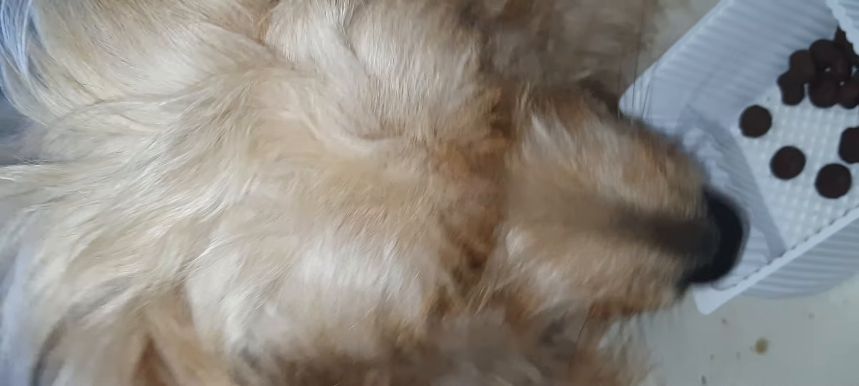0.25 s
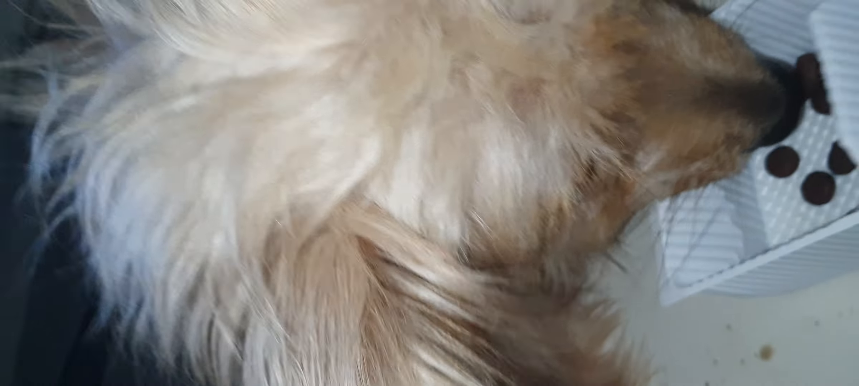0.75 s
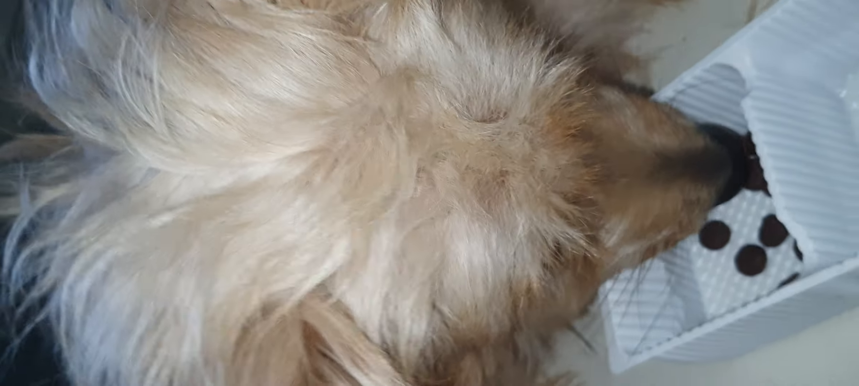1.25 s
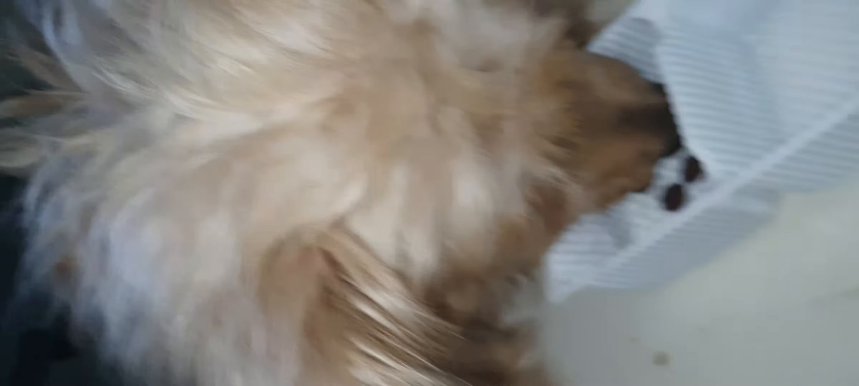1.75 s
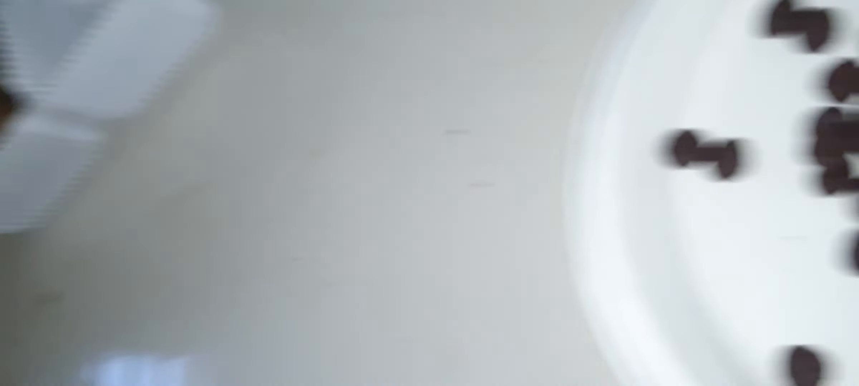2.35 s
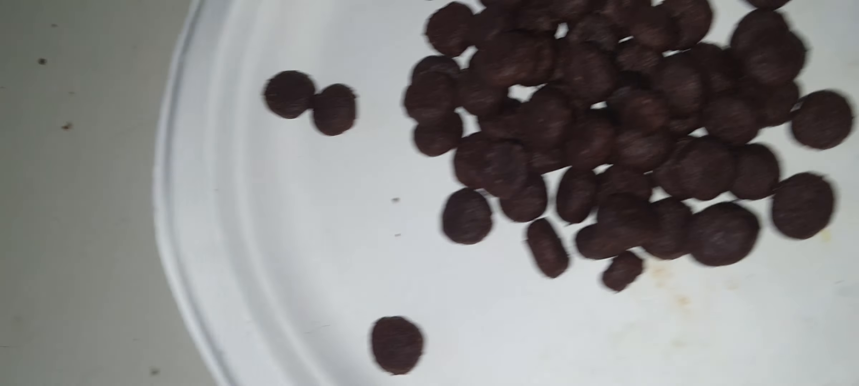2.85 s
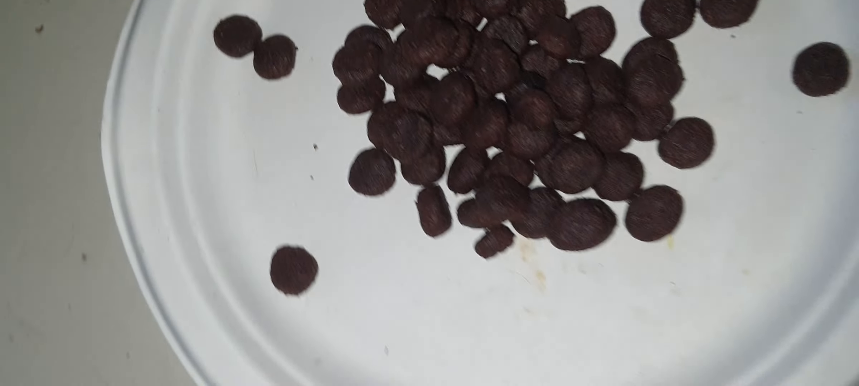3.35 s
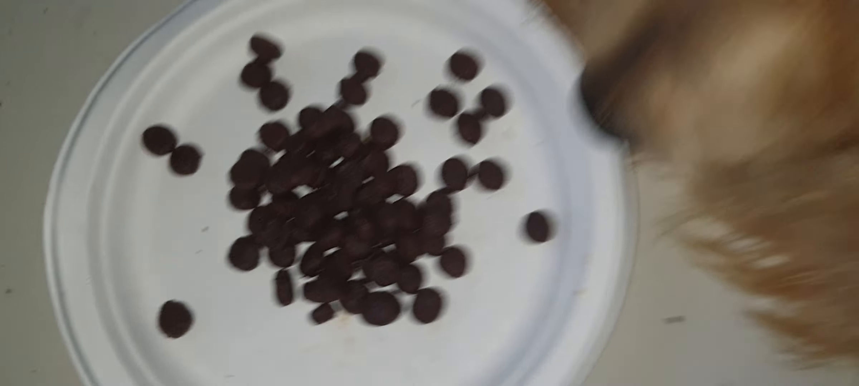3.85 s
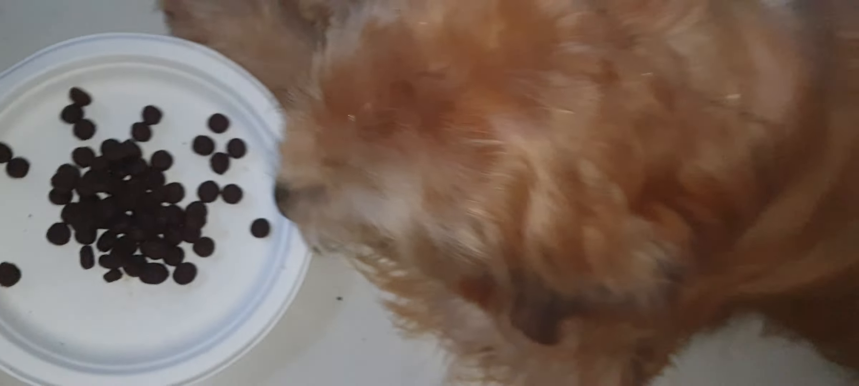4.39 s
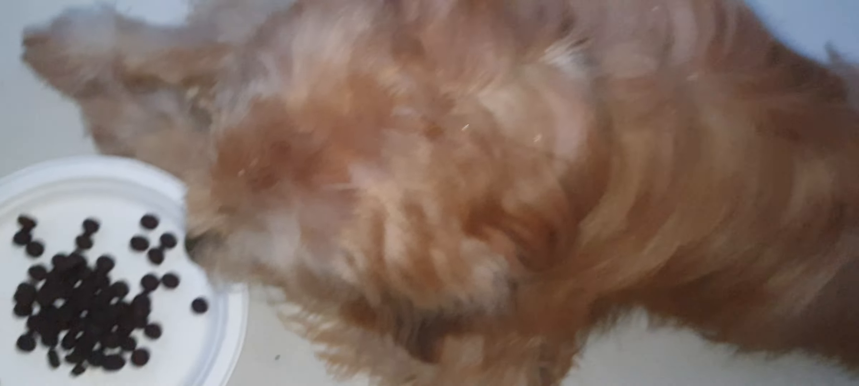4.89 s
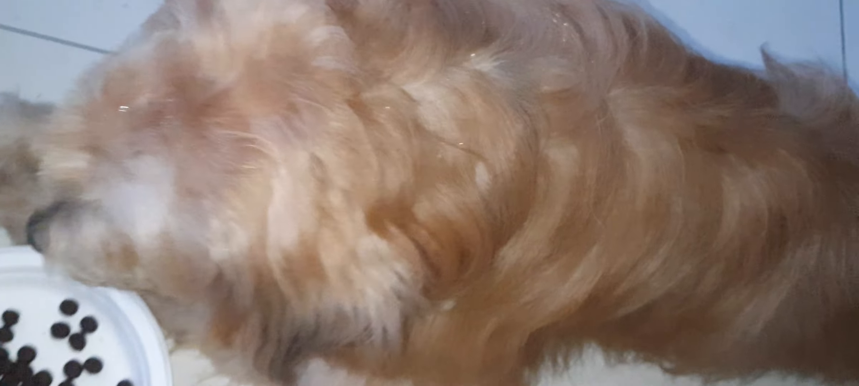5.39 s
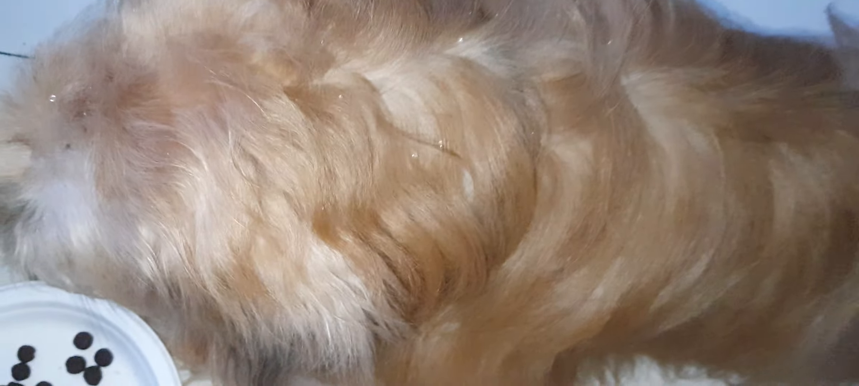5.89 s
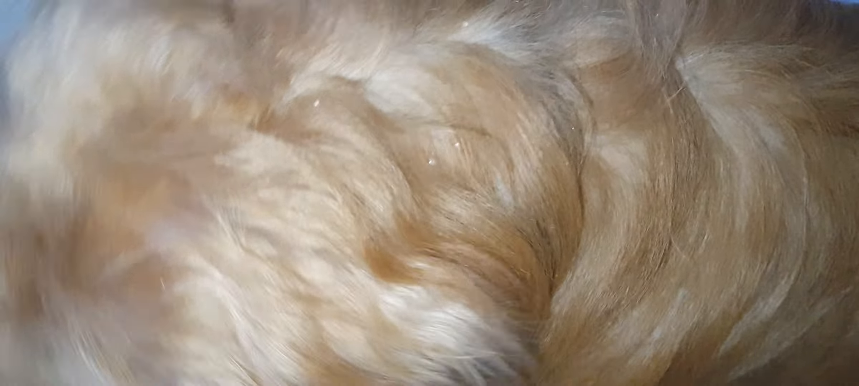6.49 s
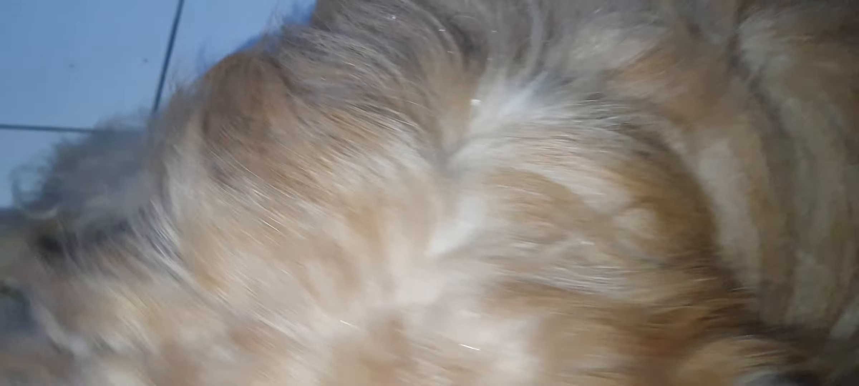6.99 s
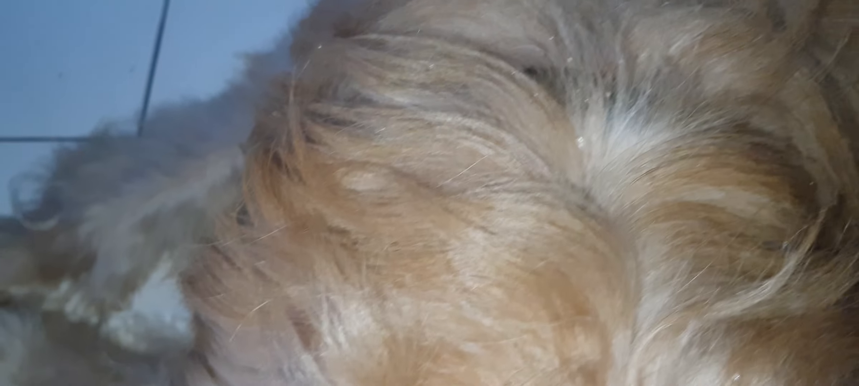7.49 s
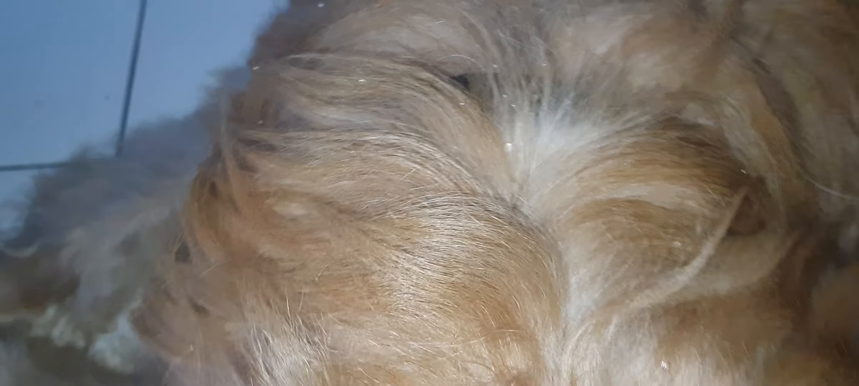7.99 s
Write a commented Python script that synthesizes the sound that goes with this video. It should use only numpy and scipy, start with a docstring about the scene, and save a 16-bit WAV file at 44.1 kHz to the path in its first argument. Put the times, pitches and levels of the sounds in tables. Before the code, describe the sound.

A small dog, very close to a hand-held microphone, starts with a soft closed-mouth grumble and a sniff. At about 0.7 seconds it gives one low, fluttering growl with snarling breath, the loudest sound, fading by 1.5 seconds. From 1.6 seconds it eats dry biscuits: teeth click lightly, and biscuits crack and crumble in a cluster between 2.5 and 3.1 seconds. A few sharp clicks follow until 4 seconds while a low rumble swells. More crunches come unevenly from 4.8 to 6.4 seconds, then several sniffs up to 7.3 seconds. The strongest crunch, with a dull jaw knock, lands at about 7.6 seconds, as the coat rustles past the microphone and small clicks continue to the end, just after 8 seconds. The eating has a short, faint echo from tiles, and the dog sits slightly right. Quiet room noise and a low hum run throughout.

```python
"""A small dog growls once over its dry biscuits, then eats them from a plastic tray and a plate, close up.
Slack throat tissue flaps to make the growl, with a closed-mouth grumble either side of it. Teeth click,
jaws knock and biscuits crack and crumble, with a short echo off the tiled floor and walls. Air hisses
through the nose, and the coat brushes past the hand-held microphone. Underneath lies a bed of room
noise, low hum and rumble."""
import sys
import numpy as np
from scipy import signal
from scipy.fft import rfft, irfft
from scipy.io import wavfile
from scipy.ndimage import uniform_filter1d

SR = 44100
rng = np.random.default_rng(int(sys.argv[2]) if len(sys.argv) > 2 else 0)


def persist_wave(psi):
    """Save psi, clipped to +-1, as 16-bit WAV."""
    counts = np.round(np.clip(psi, -1, 1) * 32767).astype(np.int16)
    wavfile.write(sys.argv[1], SR, np.atleast_2d(counts).T)


N = 363384
TIME = np.arange(N) / SR
FREQ = np.maximum(np.arange(N // 2 + 1) * SR / N, 1)

# the growl's contour: t/s, flap rate/Hz, effort/dB
GROWL = [(.675, 33, -54), (.695, 30, -18), (.735, 32.5, -13.5), (.85, 34.5, -16.5), (.92, 30.3, -18),
         (1.12, 26.6, -16.5), (1.27, 31.5, -21), (1.33, 23, -26.5), (1.41, 21, -61)]
# the lips draw back: t/s of the widest, half length/s, opening/dB
SNARLS = [(0.697, 0.012, 18.5), (0.774, 0.038, 10.5), (0.966, 0.032, 2.5), (1.179, 0.018, 9)]
# resonances of chest, throat, mouth, nose and the grumble's rasp: f/Hz, width/Hz, level/dB
CHEST_MODES = [(104, 54.4, -6.5), (154.6, 10.3, -4)]
THROAT_MODES = [(200.6, 37, 0.21), (236.7, 60, -1.2)]
MOUTH_MODES = [(443, 230, -20.5), (513, 156, -21.5), (610.6, 34, -16.5), (770, 550, -36), (1444, 240, -33),
               (2106, 960, -46.5)]
NOSE_MODES = [(4650, 1760, -3), (6830, 1800, -1), (12200, 2500, -12)]
RASP_MODES = [(100.5, 66, 2.0), (154, 184, -10), (257, 270, -22.5)]
# envelope of the closed-mouth grumble: t/s, level/dB
GRUMBLE_LEVEL = [(0, -26.5), (.08, -37.5), (.186, -31), (.255, -43), (.3, -32.5), (.48, -35.5),
                 (.66, -35.5), (1.38, -33), (1.56, -52.5)]
# biscuits breaking: t/s, crack level/dB, crack f/Hz, crumble level/dB, crumble t60/s
BITES = [(1.804, -41, 3450, -38, 0.49), (2.5802, -24, 4630, -30, 0.11), (2.617, -18.5, 3100, -30.5, 0.42),
         (2.9069, -27, 3900, -28.5, 0.7), (3.059, -39, 2330, -26.5, 0.21), (4.7658, -21, 7460, -24, 0.42),
         (4.9082, -23.5, 6200, -29, 0.31), (5.2137, -25, 2690, -33, 0.27), (5.7534, -27.5, 2577, -31, 0.49),
         (5.934, -24.5, 3980, -34, 0.27), (6.164, -32, 7450, -38, 0.78), (6.239, -36, 5800, -28.5, 0.27),
         (6.399, -32, 2280, -30, 0.42), (7.5631, -20, 2190, -30, .03), (7.5792, -28, 2600, -21, 0.037),
         (7.5867, -15.5, 3100, -15.5, 0.041), (7.7158, -18, 4220, -33, .03)]
# teeth and biscuits clicking: t/s, level/dB, f/Hz
CLICKS = [(1.6227, -27, 3790), (1.6876, -25, 6760), (1.718, -28, 3090), (1.8602, -24, 3940),
          (2.2533, -28, 3430), (2.2952, -23, 6030), (2.4074, -34, 1740), (2.4763, -15, 4450),
          (2.6409, -24, 3690), (2.9218, -18, 3750), (3.2321, -34, 2310), (3.4201, -24, 6360),
          (3.5169, -15, 6890), (3.8821, -15, 5390), (4.7865, -23, 7440), (5.1437, -33, 2910),
          (6.4113, -24, 1950), (7.236, -25, 3470), (7.4709, -31, 2150), (7.5004, -25, 3760),
          (7.873, -20, 6190), (8.0182, -26, 7220), (8.0596, -23, 6500), (8.0845, -25, 5470)]
# dull knocks of the jaws: t/s, level/dB, f/Hz
KNOCKS = [(3.073, -39, 630), (3.519, -38, 950), (4.915, -37.5, 545), (7.586, -25.5, 1040)]
# spells of stray ticks: start/s, end/s, level/dB, f/Hz
TICK_SPELLS = [(1.801, 1.85, -36, 4240), (2.899, 3.099, -38, 2200), (4.851, 4.999, -39, 2600),
               (5.768, 5.9, -40, 2200), (6.745, 6.9, -36, 2434), (7.203, 7.304, -34, 2530),
               (7.509, 7.704, -30.5, 2380), (7.749, 8.2, -32, 6500)]
# where the muzzle sits in the stereo image: t/s, left minus right/dB
MUZZLE_PAN = [(2.3, -6), (3.0, -5), (3.7, -17), (4.8, -5.5), (7.2, -2.5), (7.6, -6)]
# sniffs and puffs: t/s of the peak, level/dB, swell/s, tilt/(dB per octave)
SNIFFS = [(.192, -33, 0.017, 6), (.55, -39.5, 0.042, 5.5), (.71, -30.5, 0.024, 0.5),
          (.79, -30.5, .03, -1.5), (1.37, -39, 0.083, 5), (2.015, -47, 0.02, 4), (2.38, -47, 0.084, 2),
          (2.725, -39.5, 0.021, 3.5), (3.869, -48, 0.04, 3), (6.473, -38.5, 0.028, 10),
          (6.82, -40, 0.044, 6), (7.0, -44.5, 0.14, 8.5), (7.25, -32.5, 0.028, 4.5)]
# how firmly the coat brushes past: t/s, level/dB
COAT_TOUCH = [(7.49, -39), (7.57, -38), (7.595, -36), (7.69, -33), (7.85, -42), (7.93, -36), (8.04, -41.5),
              (8.24, -45.5)]
# tone of crumbs, nostril air, and the coat's body and sheen: f/Hz, level/dB
CRUMB_EQ = [(150, -19), (400, 33), (1000, 24), (2300, 16), (3500, 8), (5000, 7.5), (7200, 3.5),
            (16000, -8.5)]
SNIFF_EQ = [(200, 18), (600, 8.5), (1500, 2), (2400, 3.5), (3400, 0), (5000, 1), (7200, -1), (16000, -8.5)]
COAT_BODY_EQ = [(150, -2), (380, 2.5), (800, -4.5), (1300, -2.5), (2300, 1.5), (3500, -5.5),
                (6000, -19), (16000, -34)]
COAT_SHEEN_EQ = [(1000, -36), (3000, 6), (4500, 21), (7200, 25.5), (16000, 18)]
# envelope of the room noise: t/s, level/dB
ROOM_LEVEL = [(0, -42), (.6, -52.5), (2.35, -53.5), (2.7, -46.5), (5.1, -45.5), (6.7, -47), (8.24, -45.5)]
# envelope of the rumble, strongest as the microphone swings over to the plate: t/s, level/dB
RUMBLE_LEVEL = [(1.55, -47), (2.05, -42.5), (2.4, -46.5), (2.6, -40), (3.8, -33.5), (4.0, -41),
                (4.6, -47.5), (4.9, -39.5), (5.15, -51.5), (6.5, -43), (6.72, -49.5), (7.9, -42)]
# resonances of the rumble: f/Hz, width/Hz, level/dB
RUMBLE_MODES = [(41.6, 39, -8.5), (66.4, 20, -1), (89.6, 12.4, 2.5), (109.7, 22, 2), (137.6, 39.5, -3),
                (202.7, 156, -11.5)]
# partials of the hum: f/Hz, level/dB
HUM_PARTIALS = [(110, -59.5), (329, -61)]
# tone of the room noise, the hiss and the microphone: f/Hz, level/dB
ROOM_EQ = [(25, -9), (45, -2), (100, 13), (190, -8), (320, 3.5), (450, -3), (700, -4), (1100, -7.5),
           (2000, -15.5), (4000, -21), (16000, -37)]
HISS_EQ = [(500, -1.5), (2000, -6), (4000, -6), (7000, -3.5), (16000, -9)]
MICROPHONE_EQ = [(20, -25), (45, -0.5), (65, 0), (7400, -3), (8400, -10.5), (9700, -24), (12000, -9.5),
                 (16000, -7)]

CLICK_T60_S, BITE_T60_S = .006, .012  # a tooth taps more briefly than a biscuit breaks


def growl(throat_db=-6, mouth_db=-10, nose_db=-24, sag_db_per_s=7, lag_s=.00041):
    """Slack throat tissue flaps unevenly, thumping the chest and puffing through throat, mouth and nose."""
    jitter, scatter_db, flutter_db = .03, 1.1, 2.2
    open_share, leak = .5, .27
    onset_s = GROWL[1][0]
    flap_hz, effort_db = curves(GROWL)
    opening_db = sum(db * swell(TIME - s, width) for s, width, db in SNARLS)
    cycles = np.cumsum(flap_hz * (1 + jitter * drift(30)) * (TIME > onset_s)) / SR
    flap = np.ceil(cycles).astype(int)
    strength = undb(scatter_db * rng.standard_normal(1024))[flap]
    # soft tissue closes over about a millisecond
    thumps = uniform_filter1d(unit(np.diff(flap, prepend=0) * strength), size=44)
    # the gap snaps open, flutters wetly and closes again within each cycle
    gap = np.exp(-(cycles % 1 / open_share) ** 3) + leak
    puff = unit(strength * gap * undb(flutter_db * drift(200)))
    spittle = grains(N, rate_hz=7000, spread_db=2.5)
    chest = resonate(thumps + .45 * puff * diffuse_noise(), CHEST_MODES) * pan(-6)
    throat = resonate(thumps + 1.1 * puff * diffuse_noise(), THROAT_MODES) * pan(-6.5)
    mouth = resonate(thumps + 2.2 * puff * diffuse_noise(), MOUTH_MODES) * pan(-8.5)
    nose = resonate(puff * spittle, NOSE_MODES) * pan(-15)
    # the chest tone sags as the lungs empty
    chest *= undb(-sag_db_per_s * np.maximum(TIME - onset_s, 0))
    # open lips let out more air and mouth tone and take pressure off the chest
    mouth *= undb(mouth_db + .55 * opening_db)
    nose *= undb(nose_db + opening_db)
    voice = chest + undb(throat_db) * throat + mouth + nose
    left, right = voice * undb(effort_db - .31 * opening_db) * gate(GROWL)
    return np.array([np.interp(TIME - lag_s, TIME, left), right])  # reaches the left a little later


def grumble(pitch_hz=96, waver=.045, roughness=.72, air_db=-46):
    """The chest rumbles softly and unsteadily with the mouth shut; the air leaves through the nose."""
    tone = sine(pitch_hz * (1 + waver * drift(29.3)))
    rasp = resonate(diffuse_noise(), RASP_MODES)
    air = equalise(diffuse_noise(), HISS_EQ) * undb(air_db) * pan(-10)
    level_db, = curves(GRUMBLE_LEVEL)
    chest = unit(tone + roughness * rasp) * undb(level_db) * pan(-4)
    return (chest + air) * gate(GRUMBLE_LEVEL)


def bites(crumble_db=-4, rise_s=.0038, size=22050):
    """A biscuit cracks, then gives way in a dying shower of tiny fractures."""
    out, t = np.zeros((2, N)), np.arange(size) / SR
    for s, crack_db, hz, db, t60 in BITES:
        envelope = np.minimum(t / rise_s, 1) * decay(np.maximum(t - rise_s, 0), t60)
        tilt_db = 10.5 + 5 * np.log2(hz / 4000)  # a brighter crack leaves brighter crumbs
        crumbs = tilted(grains(size, rate_hz=7000, spread_db=2.6), CRUMB_EQ, tilt_db)
        add(out, s, crack(crack_db, hz, BITE_T60_S, width=2.3, body_db=-6) * muzzle_pan(s, hz))
        add(out, s, crumbs * envelope * undb(db + crumble_db) * muzzle_pan(s, hz))
    return out


def crack(db, hz, t60, width, body_db, size=4096):
    """A broad snap: a brief burst of fracture rings a wide resonance and trails a faint rattle."""
    trim_db, snap_db, rattle_db, rattle_t60_s, lag_s = -6.3, -9, -24, .045, .0003
    t, freq = np.arange(size) / SR, frequencies(size)
    envelope = decay(t, t60) + undb(rattle_db) * decay(t, rattle_t60_s)
    shared, left, right = rng.standard_normal((3, size)) * envelope
    burst = np.array([shared + left, np.interp(t - lag_s, t, shared + right, left=0)])
    ring = resonances([(hz, width * hz, 0), (1800, 4500, body_db)], freq)
    snap = shape(burst, ring + undb(snap_db) * freq / (freq + 700))
    snap /= np.sqrt(np.sum(snap ** 2, axis=1, keepdims=True) / (.004 * SR))  # energy of 4 ms at rms 1
    return snap * undb(db + trim_db)


def clicks():
    """Teeth tap on biscuits and biscuits on the dish."""
    out = np.zeros((2, N))
    for s, db, hz in CLICKS:
        add(out, s, crack(db, hz, CLICK_T60_S, width=1.2, body_db=-6) * muzzle_pan(s, hz))
    return out


def jaw_knocks(attack_s=.00052, t60=.036, width=.73, size=4096):
    """The jaws close on a biscuit and the mouth rings briefly."""
    out, t = np.zeros((2, N)), np.arange(size) / SR
    envelope = np.minimum(t / attack_s, 1) * decay(t, t60)
    for s, db, hz in KNOCKS:
        ring = resonate(rng.standard_normal(size), [(hz, width * hz, 0)])
        add(out, s, ring * envelope * undb(db) * pan(-5))
    return out


def stray_ticks(rate_hz=20, scatter_db=4, scatter_octaves=.4):
    """Faint ticks fall at uneven moments, each with its own weight and colour."""
    out = np.zeros((2, N))
    for start, end, db, hz in TICK_SPELLS:
        for s in np.arange(start, end, 1 / rate_hz):
            strength, pitch = rng.uniform(-.58, 1, 2)
            tick_hz = hz * 2 ** (scatter_octaves * pitch)
            tick = crack(db + scatter_db * strength, tick_hz, CLICK_T60_S, width=1, body_db=-12)
            onset_s = min(s + rng.random() / rate_hz, TIME[-1])
            add(out, onset_s, tick * muzzle_pan(s, hz))
    return out


def sniffs(trim_db=1, size=32768):
    """Air hisses through the nostrils, fading more slowly than it swells."""
    out = np.zeros((2, N))
    for s, db, swell_s, tilt_db in SNIFFS:
        start = max(s - np.pi * swell_s, 0)
        envelope = swell(start - s + np.arange(size) / SR, swell_s, fade=1.64)
        air = tilted(grains(size, rate_hz=20000, spread_db=1.2), SNIFF_EQ, tilt_db)
        add(out, start, air * envelope * undb(db + trim_db))
    return out * pan(-6)


def coat_rustle(firm_tilt_db=-4.5, brightening=.65, patchiness_db=1.6):
    """Hairs catch and slip in patches; a lighter touch sounds brighter."""
    touch_db, = curves(COAT_TOUCH)
    tilt_db = firm_tilt_db + brightening * (touch_db.max() - touch_db)
    slips = grains(N, rate_hz=9000, spread_db=2.1) * undb(patchiness_db * drift(130))
    body = .52 * equalise(slips, COAT_BODY_EQ) * undb(-tilt_db)
    sheen = 1.48 * equalise(slips, COAT_SHEEN_EQ) * undb(tilt_db / 2)
    return (body + sheen) * undb(touch_db) * gate(COAT_TOUCH) * pan(-7)


def tile_echo(x, wet_db=-15, t60=.37, predelay_s=.004, size=13230):
    """Tiles and walls add a short, faint tail to a sound."""
    t = np.arange(size) / SR
    response = rng.standard_normal((2, size)) * decay(t, t60) * (t > predelay_s)
    response /= np.sqrt(np.sum(response ** 2, axis=1, keepdims=True))
    return x + undb(wet_db) * signal.fftconvolve(x, response, axes=1)[:, :N]


def room_tone(flicker_db=1, hiss_db=-53, rumble_trim_db=-2, surge_db=3, hum_waver=.01335):
    """The bed: flickering room noise, faint hiss, a surging low rumble and a wavering hum."""
    noise_db, = curves(ROOM_LEVEL)
    rumble_db, = curves(RUMBLE_LEVEL)
    noise = equalise(diffuse_noise(), ROOM_EQ) * undb(noise_db + flicker_db * drift(7.5))
    hiss = equalise(diffuse_noise(), HISS_EQ) * undb(hiss_db)
    rumble = resonate(diffuse_noise(), RUMBLE_MODES)
    rumble *= undb(rumble_db + rumble_trim_db + surge_db * np.tanh(drift(9)))
    hum = np.zeros(N)
    for hz, db in HUM_PARTIALS:
        amplitude = np.sqrt(2) * undb(db + 2 * drift(3.2))
        hum += amplitude * sine(hz * (1 + hum_waver * drift(12)))
    hum *= undb(noise_db - noise_db.mean())  # swells with the room noise
    return noise * pan(-5) + hiss * pan(-8.5) + (rumble + hum) * pan(-8)


def undb(db):
    """Decibels to gain."""
    return 10 ** (np.asarray(db) / 20)


def unit(x):
    """Scale to rms 1."""
    return x / np.sqrt(np.mean(x ** 2) + 1e-30)


def curves(table):
    """A table's columns as automation curves over time."""
    s, *columns = np.transpose(table)
    return [np.interp(TIME, s, column) for column in columns]


def gate(table, edge_s=.0042):
    """Open from a table's first time to its last, with soft edges."""
    return np.clip(np.minimum(TIME - table[0][0], table[-1][0] - TIME) / edge_s + 1, 0, 1)


def swell(t, width, fade=1):
    """A smooth rise to 1 at t = 0 and a fall that is fade times as long."""
    return np.exp(-.5 * (t / np.where(t < 0, width, width * fade)) ** 2)


def decay(t, t60):
    """A fall of 60 dB every t60 seconds."""
    return undb(-60 * t / t60)


def drift(rate_hz):
    """Smooth random modulation with a spread near 1."""
    hold = int(SR / rate_hz)
    steps = np.repeat(rng.standard_normal(N // hold + 1), hold)
    return 1.25 * uniform_filter1d(uniform_filter1d(steps, hold), hold)[:N]


def sine(hz):
    """A sine that follows a pitch curve."""
    return np.sin(2 * np.pi * np.cumsum(hz) / SR)


def diffuse_noise(crossover_hz=620):
    """Stereo noise, nearly mono in the bass and wide in the treble."""
    likeness = .94 / (1 + (FREQ / crossover_hz) ** 3)
    mid, side = shape(rng.standard_normal((2, N)), np.sqrt([1 + likeness, 1 - likeness]))
    return unit(np.array([mid + side, mid - side]))


def grains(n, rate_hz, spread_db):
    """Stereo crackle: tiny impulses of unequal size at random moments."""
    strength = undb(spread_db * np.minimum(rng.exponential(size=n), 4))
    fires = rng.random(n) < rate_hz / SR
    return unit(strength * fires * rng.standard_normal((2, n)))


def frequencies(n):
    """The frequency axis for n samples, floored at 1 Hz."""
    return np.maximum(np.fft.rfftfreq(n, 1 / SR), 1)


def shape(x, response):
    """Filter by a frequency response."""
    return irfft(rfft(x) * response, x.shape[-1])


def eq_gain(points, freq=FREQ):
    """Gain of an EQ curve through (f/Hz, level/dB) points."""
    hz, db = np.transpose(points)
    return undb(np.interp(np.log(freq), np.log(hz), db))


def equalise(x, points):
    """Colour a full-length sound with an EQ curve, at rms 1."""
    return unit(shape(x, eq_gain(points)))


def tilted(x, points, tilt_db):
    """EQ a short sound and lean it about 4 kHz by tilt_db per octave up to 8 kHz, at rms 1."""
    freq = frequencies(x.shape[1])
    octaves = np.log2(np.minimum(freq, 8000) / 4000)
    return unit(shape(x, eq_gain(points, freq) * undb(tilt_db * octaves)))


def resonances(modes, freq):
    """Causal response of steep resonances whose powers add."""
    power = sum(undb(2 * db) / (1 + ((freq ** 2 - hz ** 2) / (freq * width)) ** 2) ** 3
                for hz, width, db in modes)
    # minimum phase, so the ring follows the hit
    cepstrum = irfft(np.log(power + 1e-12))
    cepstrum[0] /= 2
    cepstrum[len(freq) - 1:] = 0
    return np.exp(rfft(cepstrum))


def resonate(x, modes):
    """Ring a set of resonances with a sound, at rms 1."""
    return unit(shape(x, resonances(modes, frequencies(x.shape[-1]))))


def pan(db):
    """Stereo gains for a left minus right level difference."""
    gains = undb(np.array([[db], [-db]]) / 2)
    return gains / gains.mean()


def muzzle_pan(s, hz, db_per_octave=.5):
    """Stereo gains that follow the muzzle; brighter cracks sit further right."""
    return pan(np.interp(s, *np.transpose(MUZZLE_PAN)) - db_per_octave * np.log2(hz / 4000))


def add(out, s, sound):
    """Mix a sound in at s seconds."""
    i = int(s * SR)
    out[:, i:i + sound.shape[1]] += sound[:, :N - i]


def scene():
    """The dog up front and the room behind; only the eating feeds the echo."""
    voice = growl() + grumble()
    eating = clicks() + stray_ticks() + jaw_knocks() + bites()
    return voice + tile_echo(eating) + sniffs() + coat_rustle() + room_tone()


def record(dry, top_hz=15900):
    """The microphone's ports leave a dip near 10 kHz; the deepest bass and the top are cut."""
    high_cut = signal.ellip(10, .2, 70, top_hz, fs=SR, output="sos")
    return signal.sosfilt(high_cut, shape(dry, eq_gain(MICROPHONE_EQ)))


dry = scene()
out = record(dry)
persist_wave(out)
```